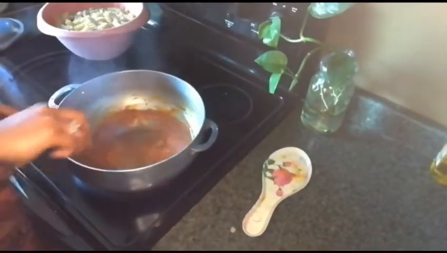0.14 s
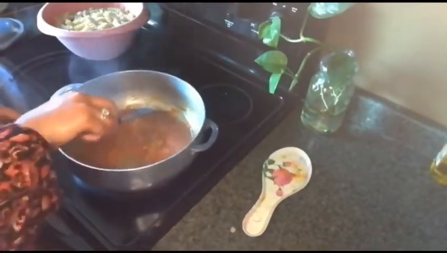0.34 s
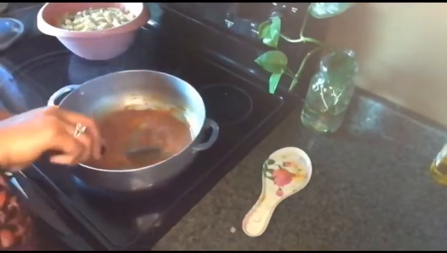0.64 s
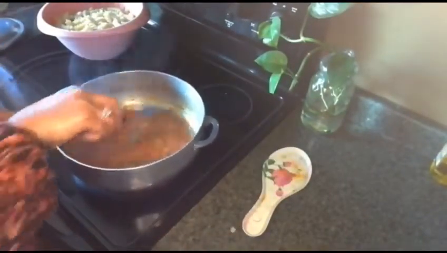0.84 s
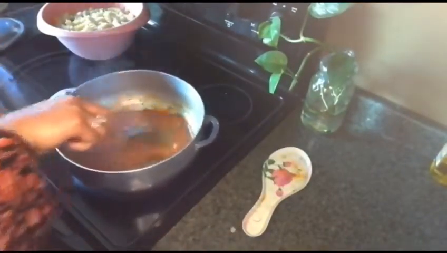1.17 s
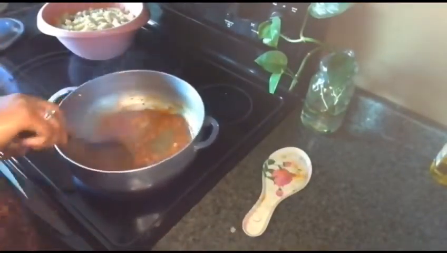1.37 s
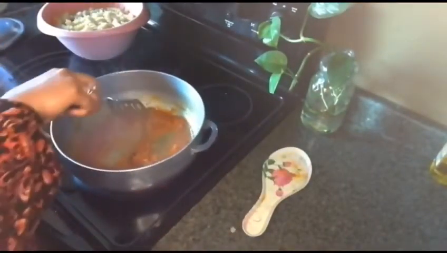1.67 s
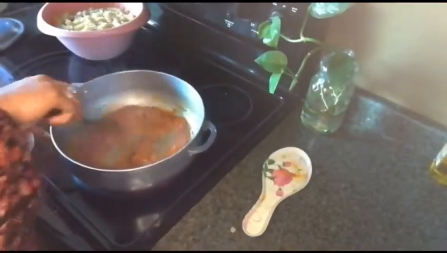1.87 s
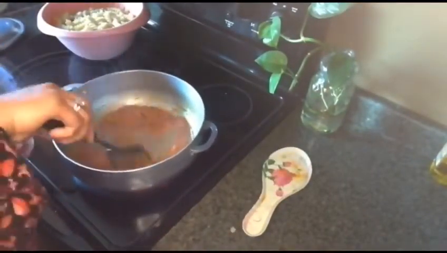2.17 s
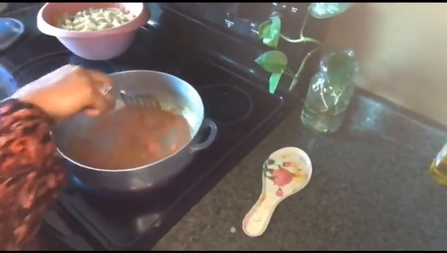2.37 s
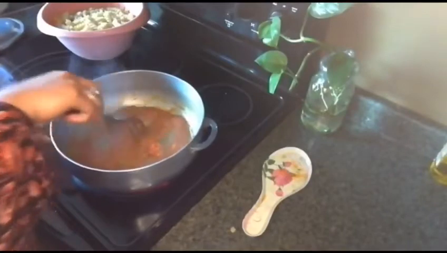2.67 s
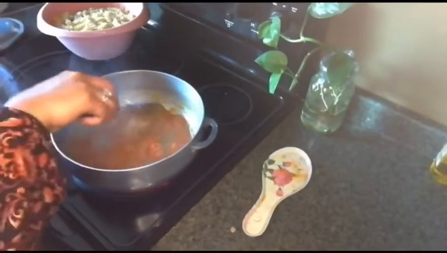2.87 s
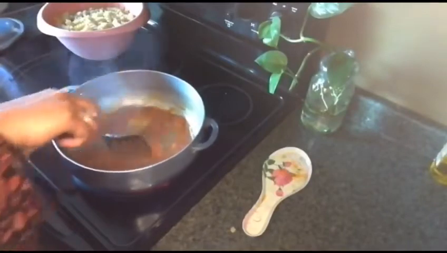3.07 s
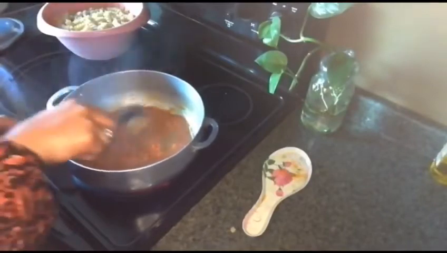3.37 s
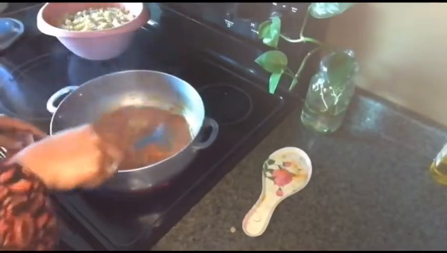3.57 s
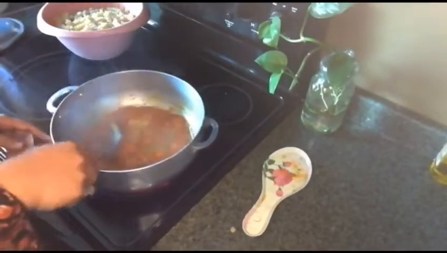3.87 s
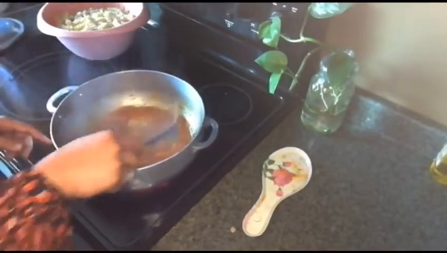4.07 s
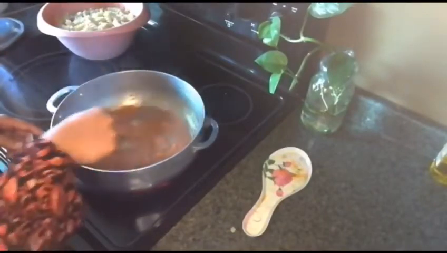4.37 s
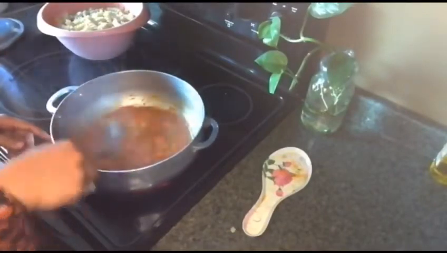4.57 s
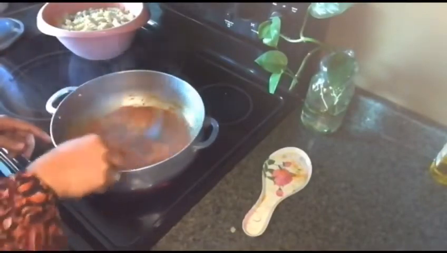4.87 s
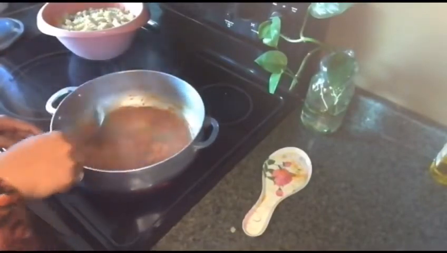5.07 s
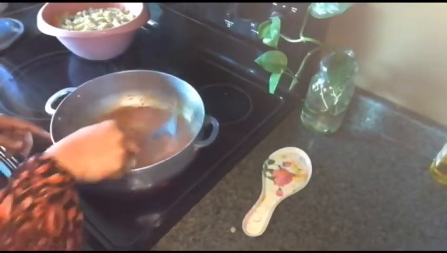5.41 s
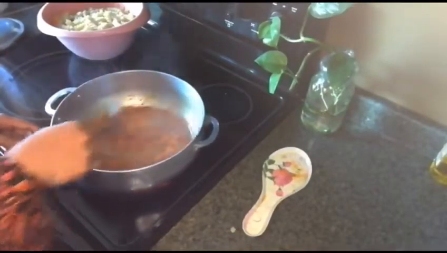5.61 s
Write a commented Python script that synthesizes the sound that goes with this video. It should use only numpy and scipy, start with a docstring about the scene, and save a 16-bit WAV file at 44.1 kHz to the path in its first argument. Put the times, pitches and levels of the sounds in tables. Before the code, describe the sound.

In a small kitchen, close to a metal pot of thick sauce, a spatula stroke fades, then nine uneven knocks strike the pot wall. The loudest come near 1.2 and 2 seconds; a pause precedes the last four. Each is a gritty clack with a short ring and slight room tail. Soft muffled drags fall between, over low rumble, faint hum and gradually sinking hiss.

```python
"""A small kitchen, a metal pot of thick sauce close to the microphone pair. It opens on room rumble, hiss and hum
(shaped noise and a wavering sine) as a stroke of the spatula over the bottom (dense muffled slips) fades.
From 0.1 s to 5 s nine knocks hit the pot wall: a blow and chattering rebounds drive decaying wall modes, with
clear tones, a lingering ring and the room's tail; soft drags fall between. Meanwhile the background sinks
unevenly; at the end a last faint drag comes as the rumble swells."""
import sys
import numpy as np
from scipy import signal
from scipy.io import wavfile
from scipy.ndimage import uniform_filter1d

SR = 44100
rng = np.random.default_rng(int(sys.argv[2]) if len(sys.argv) > 2 else 0)


def store_wav(level_fs):
    """Save 16-bit WAV to argv[1]."""
    pcm = np.round(np.clip(np.atleast_2d(level_fs), -1, 1) * 32767)
    wavfile.write(sys.argv[1], SR, pcm.T.astype(np.int16))


N = 253283

# Low noise of the place: (frequency [Hz], density [dB per Hz])
RUMBLE_SPECTRUM = [(22, -18.5), (40, -13.5), (100, -11), (300, -14.5), (410, -14), (470, -33), (700, -42)]
# Standing waves of the room that colour the rumble: (frequency [Hz], width [Hz], boost [dB])
ROOM_MODES = [(56.1, 25, 18), (150, 20, 8.5), (222, 55, 14), (274.7, 18, 12.5), (345, 12, 14),
              (415, 15, 8.5)]
# Broad hiss of the room: (frequency [Hz], density [dB per Hz])
ROOM_HISS_SPECTRUM = [(250, -28), (420, -4.5), (444, -13), (642, -10.5), (782, -13), (1050, -11.5),
                      (1480, -10.5), (1990, -12.5), (9970, -16), (11500, -11.5), (12300, -53), (16000, -62),
                      (22000, -120)]
# Thin high hiss: (frequency [Hz], density [dB per Hz])
THIN_HISS_SPECTRUM = [(4120, -41), (7000, -12), (8600, 2), (9870, 8.5), (10500, 9), (11600, -2.5),
                      (12000, -30.5), (12300, -21), (16000, -60), (22000, -120)]
# Course of the thin hiss before its side gains: (time [s], level [dB])
THIN_HISS_LEVEL = [(0.0, -52), (.7, -56.5), (1.2, -52.5), (1.55, -55), (2.4, -56.5), (3.3, -59.5),
                   (3.95, -61), (4.2, -67.5), (5.2, -68.5), (5.74, -64)]
# Course of the hum: (time [s], level [dB])
HUM_LEVEL = [(0.0, -50), (0.53, -59), (0.91, -66.5), (1.2, -61), (1.55, -63.5), (1.85, -78), (2.2, -60),
             (2.42, -77), (3.6, -73.5), (5.74, -94)]
# Likeness of the two channels in noise and room tail: (frequency [Hz], correlation [-1 to 1])
LIKENESS = [(60, 1.0), (130, 1.0), (270, 0.93), (580, -0.094), (1230, 0.17), (2620, 0.3), (5580, -0.29),
            (11900, 0.086)]
# Side balance of the background noises: (frequency [Hz], left minus right [dB])
NOISE_BALANCE = [(100, 0), (200, -1), (350, 2), (630, 2), (2000, 1.1), (6600, 0.5), (11900, -4.5)]
# Strokes of the blade through sauce over the bottom:
# (loudest moment [s], level [dB], rise width [s], fall width [s])
STROKES = [(0.0, -54, .05, 0.027), (0.26, -51, 0.039, 0.023), (0.92, -55.5, .03, 0.08),
           (2.448, -51, 0.0068, 0.0069), (4.25, -72, 0.011, 0.021), (5.69, -60, 0.049, 0.021)]
# Colour of the drag through sauce: (frequency [Hz], density [dB per Hz])
DRAG_COLOUR = [(240, -27.5), (400, 8.5), (442, -4.5), (571, -7), (781, -6.5), (4560, -2), (6330, -15.5),
               (9830, 2), (12000, -12.5), (15600, -34), (22000, -120)]
# Decay of the kitchen: (frequency [Hz], t60 [s])
KITCHEN_DECAY = [(200, 0.041), (700, 0.44), (1500, 0.3), (3000, 0.28), (6000, 0.3), (11000, 0.066)]
# Knocks on the wall: (time [s], level [dB], left minus right [dB], chatter length [ms], chatter fade [dB per ms],
# lingering ring re taps [dB], room gain [dB], strength of the first blow,
# 13 drives of the struck spot, one per MODE_GROUPS [dB], factor on the lingering t60s of POT_MODES,
# t60 of the clear tones before CLEAR_DAMPING [ms], 13 levels, one per CLEAR_MODES [dB])
KNOCKS = [(0.118, -43.5, 3.3, 14, 0.29, -12, -13, 1, 18, 3, 3, -18, 2, 1, 3.2, 1, -6, 3, -1, 8, 13, 1.1, 60, -25, -25, -25, -25, -25, -25, -25, -25, -25, -25, -25, -25, -25),
          (0.494, -20.5, 1.2, 33.4, 0.14, -18.5, -6, 0.41, 14.5, 9, -2.5, -0.5, -5.5, 1.9, 7.7, -8.5, -8, -4.5, -6.5, -0.5, 0.5, 1.2, 110, -5, -14, -25, -25, -21, -10, -9, -19, -28, -10, -8, -15, -24),
          (1.207, -7.5, 0.5, 19.3, 0.8, -22.5, -10.5, 0.28, -3, 1.0, 1, -3, -5, 1.4, 6.8, -7.5, -2, 1.5, -3, 2, 2.5, 1.26, 130, 4, -8, -16, -6.5, -14, -12.5, -10, -5, -23, -12, -9.5, -20, -17.5),
          (1.661, -23.5, 2.2, 6.8, 0.22, -18.5, -4, 0.74, 8, 11, -1, -3, 1, 1.1, 7.5, -4.5, 5, 2.5, -0.5, 12, 9.5, 0.93, 110, -7, -17, -8, -18, -12, -7, 3, -16, -7, -12, -13, -6, -11),
          (2.001, -8.5, 0.5, 13.8, 0.22, -26.5, -9, 1.03, 4.5, 9, -6, 5, -9, 6.2, 4.6, 0, -5, 1.5, -7, 1.5, -0.5, 1.37, 110, -30.5, 4, -11, -25, -19, -22, -14, -11, -28, -7, -8, -23, -22),
          (3.449, -19, 5.5, 10.5, 1, -21, -7, 0.94, -3, 12, 14, 0.5, 4, 2, 1.12, -13, -3.5, -6, -15, -12, -3, 0.91, 50, -7.5, -13, -21, -25, -28, -26, -32, -38, -40, -10, -10, -32.5, -32),
          (4.394, -23, 1.8, 26, 0, -20, -7, 0.37, 1, 4, -7.5, 3, -8.5, 10.6, 3.4, 7, -5, 0, -2, 5, 5, 1.47, 101, -24, -19, -23, 1.5, -10, -23, -23, -7, -25, -33, -12, -32, -16),
          (4.667, -17, 1.9, 8.9, 0, -14, -8, 0.77, 1.5, 4, 4.5, 1.5, 2, 1.07, 1.8, -1, -6, -7, -8, -7, -14, 0.88, 60, -8, -12, -13, -21.5, -12, -16, -29, -17, -32, -7, -11, -30, -22),
          (4.992, -15.5, 1.2, 20.2, 0, -16.5, -6, 1.4, -1, -5, -10.5, -2.5, -5.5, 1.1, 8.2, -4.5, 5.5, -4, -1.5, 3, 5.5, 0.88, 110, -15, -24, -21, -4.5, -19, -19, -19, -18, -14, -28, -9, -15, -18)]
# The blade lands once more within a knock: (time [s], strength)
BOUNCES = [(1.21, 0.75), (1.2119, 0.76), (1.2213, .4), (1.6666, 0.8), (2.0083, 0.98), (3.4523, 0.36),
           (3.4542, 0.44), (4.396, 0.29), (4.4174, 0.94), (4.6735, 0.66), (4.9946, 0.6), (5.003, 0.55),
           (5.0066, 0.7)]
# Colour of an average blow: (frequency [Hz], level [dB])
BLOW = [(60, -48), (200, -37.5), (580, -39.5), (1000, -28), (1400, -8.5), (2000, -13), (3000, -11),
        (4200, -15.5), (5600, -18), (9500, -21), (11000, -22.5), (11800, -27.5), (12500, -31)]
# Groups of wall modes that a struck spot favours or spares: (centre [Hz])
MODE_GROUPS = [220, 550, 1000, 1370, 1700, 2050, 2450, 3000, 3600, 4200, 5500, 7000, 10000]
# Modes of the pot wall before damping: (frequency [Hz], level [dB], t60 [s])
POT_MODES = [(177.7, 2.5, 0.28), (456, -41, 0.073), (584, 9.5, 0.06), (911, 5, 0.064), (1115, 0.5, 0.32),
             (1255, -14, 0.062), (1420, 1.5, 0.09), (1598, -5.5, 0.17), (1800, 3.5, 0.1), (2010, -6, 0.26),
             (1900, -4.5, 0.057), (2296, -22, 0.041), (2483, -18.5, 0.02), (2760, -6.5, 0.096),
             (2955, 0.5, 0.2), (3114, 6.5, 0.11), (3305, 4.5, 0.16), (3600, 1, 0.08), (4150, 3, 0.29),
             (4204, -27, 0.073), (4830, -3.5, 0.091), (5370, 2, 0.2), (5470, 4.5, 0.15), (5550, 8.5, 0.14),
             (5950, -12, 0.06), (6980, 0, 0.16), (6940, -7.5, .15), (7420, -9, 0.2), (7930, 0, 0.068),
             (8550, -5.5, 0.41), (9470, 2, 0.11), (10500, -2, 0.38)]
# Side balance of the pot: (frequency [Hz], left minus right [dB])
POT_BALANCE = [(200, -2.5), (400, 0.5), (630, 7), (1200, -3.5), (2000, 2), (4000, -6), (8000, -8),
               (11900, -6.5)]
# Modes that sing out as clear tones: (row of POT_MODES, counted from 0)
CLEAR_MODES = [6, 9, 12, 14, 15, 16, 18, 22, 25, 7, 8, 19, 21]

SIDES = np.array([[.5], [-.5]])  # shares a left-right difference between the channels

RUMBLE_DB, RUMBLE_SAG = -55.0, 1.4  # dB at the start, dB lost per s
SWELL_S, SWELL_RISE_S, SWELL_DB = 5.76, 0.2, 6  # the rumble is still swelling when the scene ends
ROOM_HISS_DB, SETTLE_DB, SETTLE_S = -59.0, 8, 2.43  # level it settles to, excess at the start, time constant
ROOM_HISS_PATCH_DB = 2.2  # unevenness
HUM_HZ, WAVER_HZ = 167.5, 0.7  # centre, rms wander

SLIPS_PER_S = 6000
DRAG_ROOM_DB = 1.5

CREST_DB = 7  # knock level above the rms of the direct clatter's first 15 ms
CHATTER, REBOUNDS_PER_S = 0.52, 9000  # strength in the unit of the bounces, density
CHATTER_END_MS = 0.47  # softness of the chatter's end
LEAD_MS = 1.1  # time from the start of the chatter to the first blow
PRESSED_DAMPING, CLEAR_DAMPING = 0.041, 0.82  # factors on t60
CRACK_DB, CRACK_SHARE = 1.5, 0.26  # click against the wall's ring; dB gained per dB that a knock is lighter
MUTE_DB, MUTE_MS = -34, 3.0  # drop of the clear tones as the chatter ends, softness of that drop
TONES_ROOM_DB = 0  # clear tones into the room, against the clatter

STEADY_TOP_HZ, EDGE_HZ = 11400, 12450  # upper limit of background and drag, then of everything


def gain_of(db):
    """Decibels to an amplitude factor."""
    return 10 ** (np.asarray(db) / 20)


def evened(x):
    """Scales to rms 1."""
    return x / np.sqrt(np.mean(x ** 2) + 1e-20)


def read(points, hz):
    """Reads (frequency, value) points on a log frequency axis."""
    f, value = np.transpose(points)
    return np.interp(np.log(hz + 1), np.log(f + 1), value)


def over_time(rows):
    """Draws a (time, value) curve at every sample."""
    return np.interp(np.arange(N) / SR, *np.transpose(rows))


def bell(t, middle, rise, fall):
    """A smooth swell to 1 at its middle, with its own width on either side."""
    width = np.where(t < middle, rise, fall)
    return np.exp(-.5 * ((t - middle) / width) ** 2)


def likeness(hz):
    """Correlation of the two channels at each frequency, as a column."""
    return np.clip(read(LIKENESS, hz), -1, 1)[:, None]


def causal(points, size=2048):
    """Minimum-phase filter with the given dB spectrum, so no energy precedes the contact."""
    hz = abs(np.fft.fftfreq(size, 1 / SR))
    log_gain = np.log(gain_of(np.maximum(read(points, hz), -100)))
    return np.fft.ifft(np.exp(np.conj(signal.hilbert(log_gain)))).real[:size // 2]


def noise(points, patchy_db, size=1024, modes=()):
    """Two-channel noise of a given spectrum, its level uneven in drifting patches of time and frequency."""
    frames = 4 * N // size + 5
    hz = np.fft.rfftfreq(size, 1 / SR)
    a, b, c, d, patches = rng.standard_normal((frames, len(hz), 5)).T
    patches = uniform_filter1d(patches, size=10, axis=0)
    patches = evened(uniform_filter1d(patches, size=10, axis=1))
    same = likeness(hz)
    left = a + 1j * b
    right = same * left + np.sqrt(1 - same ** 2) * (c + 1j * d)
    shape_db = read(points, hz)
    for f, width, db in modes:
        shape_db = shape_db + db / (1 + (2 * (hz - f) / width) ** 2)
    z = np.array([left, right]) * gain_of(shape_db[:, None] + patchy_db * patches)
    z *= gain_of(SIDES * read(NOISE_BALANCE, hz))[:, :, None]
    return evened(signal.istft(z, nperseg=size, noverlap=3 * size // 4)[1][:, :N])


def room_rumble():
    """Low noise, lifted at the room's standing waves, sagging steadily until a swell at the end."""
    t = np.arange(N) / SR
    swell_db = SWELL_DB * bell(t, SWELL_S, SWELL_RISE_S, SWELL_RISE_S)
    level_db = RUMBLE_DB - RUMBLE_SAG * t + swell_db
    return noise(RUMBLE_SPECTRUM, patchy_db=1.32, size=4096, modes=ROOM_MODES) * gain_of(level_db)


def room_hiss():
    """Broad noise whose excess level dies away exponentially."""
    t = np.arange(N) / SR
    level_db = ROOM_HISS_DB + SETTLE_DB * np.exp(-t / SETTLE_S)
    return noise(ROOM_HISS_SPECTRUM, ROOM_HISS_PATCH_DB) * gain_of(level_db)


def thin_hiss():
    """Narrow high noise, stronger on the right, with its own level curve."""
    side_db = np.array([[-5.0], [1.5]])
    return noise(THIN_HISS_SPECTRUM, patchy_db=2.0) * gain_of(over_time(THIN_HISS_LEVEL) + side_db)


def hum():
    """A sine alike in both channels, its pitch wavering with slow smoothed noise."""
    waver = evened(uniform_filter1d(rng.standard_normal(N), size=6000))
    cycles = np.cumsum(HUM_HZ + WAVER_HZ * waver) / SR
    return np.sqrt(2) * np.sin(2 * np.pi * cycles) * gain_of(over_time(HUM_LEVEL))


def drag():
    """Dense tiny slips of the blade, muffled by sauce, swelling and fading with each stroke."""
    t = np.arange(N) / SR
    pressure = sum(gain_of(db) * bell(t, s, rise, fall) for s, db, rise, fall in STROKES)
    strength = gain_of(0.92 * rng.exponential(1, N))
    slips = rng.standard_normal((2, N)) * strength * (rng.random(N) < SLIPS_PER_S / SR)
    slips[1] = 0.87 * slips[0] + .8 * slips[1]  # the right channel partly follows the left
    muffled = signal.oaconvolve(slips, causal(DRAG_COLOUR)[None])[:, :N]
    return pressure * evened(muffled)


def kitchen(x):
    """Sparse taps of random sign, each band dying at its own speed; the bass reaches both sides alike."""
    taps = np.zeros((2, SR // 3))
    at = np.arange(200, SR // 3 - 20, 20)
    at = at + rng.integers(0, 20, (2, len(at)))  # one reflection somewhere in every 20 samples
    np.put_along_axis(taps, at, rng.choice([-1., 1.], at.shape), 1)
    hz, t, z = signal.stft(taps, SR, nperseg=512)
    same = likeness(hz)
    z[1] = same * z[0] + np.sqrt(1 - same ** 2) * z[1]
    decay_db = -60 * t / read(KITCHEN_DECAY, hz)[:, None]
    tail = signal.istft(z * gain_of(decay_db), SR, nperseg=512)[1]
    tail /= np.linalg.norm(tail[0])
    return signal.fftconvolve(x.mean(0)[None], tail, axes=1)[:, :x.shape[1]]


def blow_colour(groups_db):
    """The average blow, with the mode groups that this spot favours or spares."""
    hz = np.geomspace(BLOW[0][0], BLOW[-1][0], 80)
    spot_db = read(list(zip(MODE_GROUPS, groups_db)), hz)
    return list(zip(hz, read(BLOW, hz) + spot_db))


def contacts(s, chatter_ms, fade_db, first):
    """Contact strengths over 45 ms: a dense chatter fading in over LEAD_MS, the first blow, later bounces."""
    ms = np.arange(2000) / SR * 1000
    rebounds = (2 * rng.random(len(ms)) - 1) * (rng.random(len(ms)) < REBOUNDS_PER_S / SR)
    ending = 1 + np.exp(np.clip((ms - chatter_ms) / CHATTER_END_MS, -50, 50))
    taps = CHATTER * rebounds * gain_of(-fade_db * ms) / ending
    taps *= np.minimum(ms / LEAD_MS, 1) ** 2
    taps[round(LEAD_MS * SR / 1000)] += first
    for at, strength in BOUNCES:
        if 0 < at - s < ms[-1] / 1000:
            taps[round((at - s) * SR)] += strength
    return taps


def ring(modes, damping, spread_db, apart_ms, split, count, size):
    """Decaying modes after one tap: each can be a cluster of randomly detuned, beating neighbours;
    strength and side-to-side lag of each vary at random."""
    hz, db, t60 = np.repeat(np.transpose(modes), count, axis=1)
    vary, skew, shift = rng.standard_normal((3, len(hz)))
    hz = hz * (1 + split * shift)
    rate = 2j * np.pi * hz - np.log(1000) / (t60 * damping)
    swing = np.exp(np.outer(rate, np.arange(size) / SR).astype(np.complex64))
    lag = np.exp(2j * np.pi * hz * SIDES * apart_ms * skew / 1000)
    strength = gain_of(db + spread_db * vary + SIDES * read(POT_BALANCE, hz))
    return ((strength * lag / np.sqrt(count)) @ swing).imag


def clear_tones(t60_ms, tones_db, chatter_ms):
    """The first blow sets a few modes singing until the blade settles on the wall and mutes them."""
    modes = [(POT_MODES[k][0], db, t60_ms / 1000) for k, db in zip(CLEAR_MODES, tones_db)]
    ms = np.arange(3000) / SR * 1000
    mute_db = MUTE_DB / (1 + np.exp(np.clip((chatter_ms - ms) / MUTE_MS, -50, 50)))
    tones = ring(modes, CLEAR_DAMPING, spread_db=2.1, apart_ms=0.11, split=0.0034, count=1, size=len(ms))
    return gain_of(mute_db) * tones


def knock(row):
    """A blow and a dense chatter of rebounds; the pressed blade damps the wall, while a weaker ring lingers."""
    s, db, pan_db, chatter_ms, fade_db, linger_db, room_db, first = row[:8]
    groups_db, (damping, clear_ms, *tones_db) = row[8:21], row[21:]
    hit = round(LEAD_MS * SR / 1000)  # sample of the first blow
    taps = contacts(s, chatter_ms, fade_db, first)
    colour = causal(blow_colour(groups_db))

    linger = ring(POT_MODES, damping, spread_db=2.5, apart_ms=0.1915, split=0.028, count=10, size=7000)
    linger *= gain_of(linger_db) * np.linalg.norm(taps)  # scales with all the taps together
    wall = ring(POT_MODES, PRESSED_DAMPING, spread_db=-1.0, apart_ms=0.14, split=0.0026, count=1, size=1000)
    wall[:, 0] += gain_of(CRACK_DB - CRACK_SHARE * db)  # dry click of the contact
    clatter = signal.fftconvolve(taps[None], wall, axes=1)

    pot = np.pad(linger, ((0, 0), (hit, 0)))
    pot[:, :clatter.shape[1]] += clatter
    sound = signal.fftconvolve(colour[None], pot, axes=1)
    sound /= np.sqrt(np.mean(sound[:, :660] ** 2))  # rms 1 over the first 15 ms

    tones = clear_tones(clear_ms, tones_db, chatter_ms)
    tones = np.pad(tones, ((0, 0), (hit, sound.shape[1] - hit - tones.shape[1])))
    room = gain_of(room_db) * kitchen(sound + gain_of(TONES_ROOM_DB) * tones)
    direct = (sound + tones) * gain_of(SIDES * pan_db)
    return s, (direct + room) * gain_of(db - CREST_DB)


def scene():
    """Background and drags below their upper limit, then each knock laid in at its time."""
    background = room_rumble() + room_hiss() + thin_hiss() + hum()
    rub = drag()
    mix = background + rub + gain_of(DRAG_ROOM_DB) * kitchen(rub)
    mix = signal.sosfilt(signal.butter(6, STEADY_TOP_HZ, fs=SR, output="sos"), mix)
    for row in KNOCKS:
        s, sound = knock(row)
        part = mix[:, round(s * SR):][:, :sound.shape[1]]  # a view into the mix
        part += sound[:, :part.shape[1]]
    return mix


def record(dry):
    """Rounds off the loudest peaks, then cuts the top steeply at the band limit."""
    rounded = .95 * np.tanh(dry / .95)
    band = signal.firwin(511, EDGE_HZ, window=("kaiser", 9), fs=SR)
    return signal.oaconvolve(rounded, band[None], "same")


dry = scene()
out = record(dry)
store_wav(out)
```